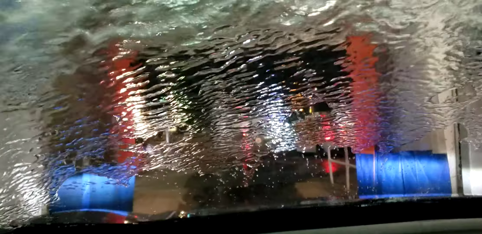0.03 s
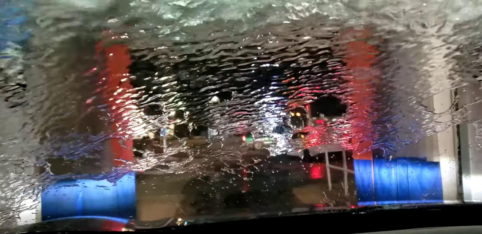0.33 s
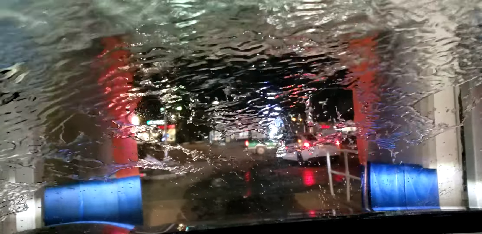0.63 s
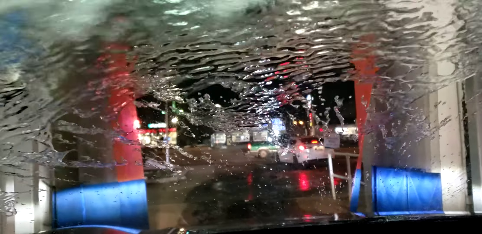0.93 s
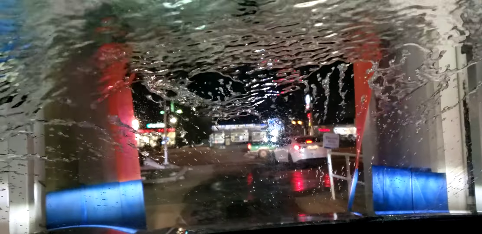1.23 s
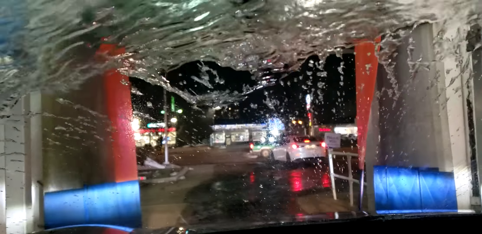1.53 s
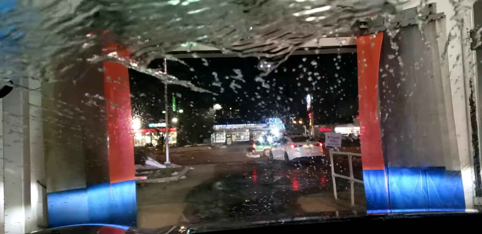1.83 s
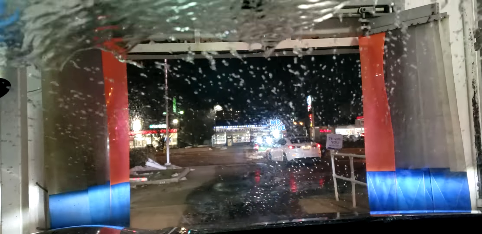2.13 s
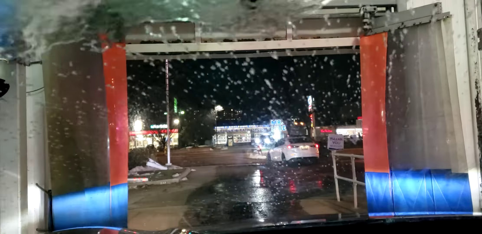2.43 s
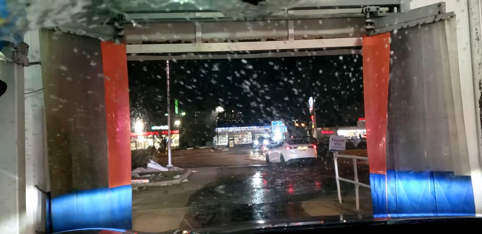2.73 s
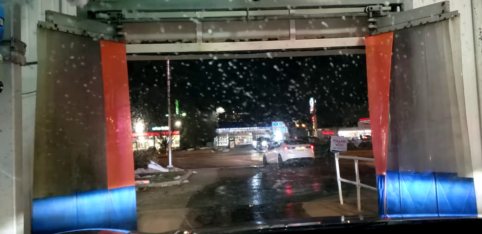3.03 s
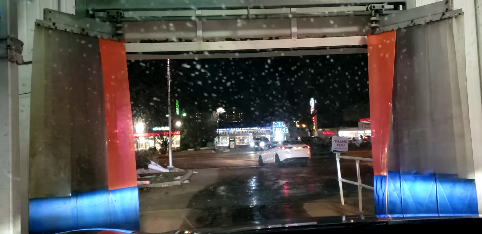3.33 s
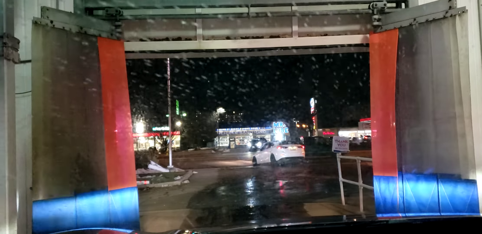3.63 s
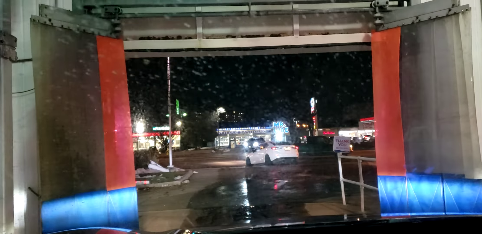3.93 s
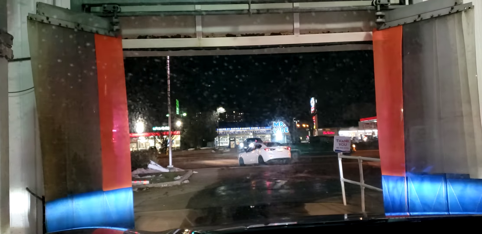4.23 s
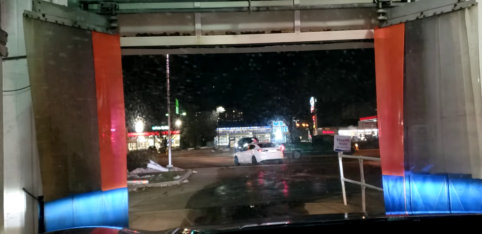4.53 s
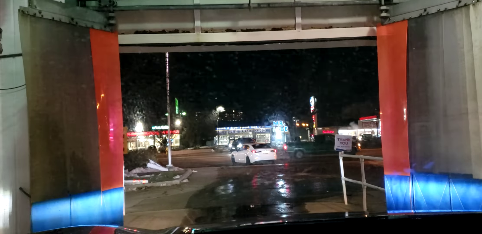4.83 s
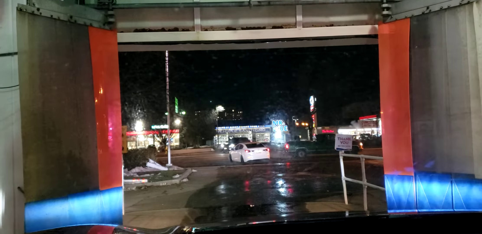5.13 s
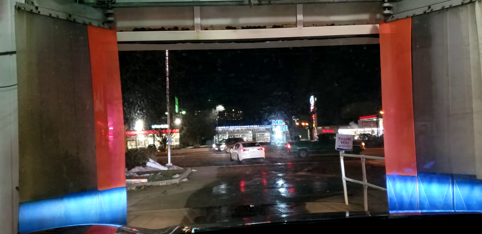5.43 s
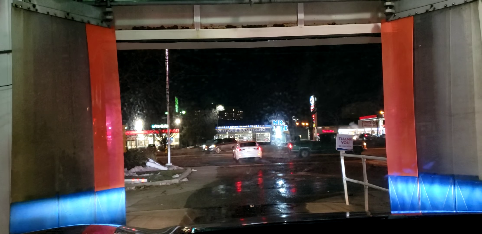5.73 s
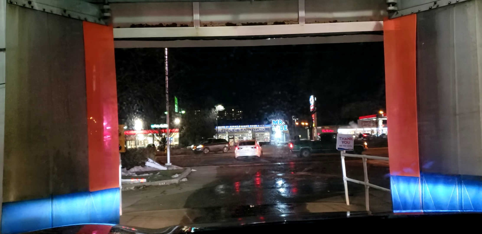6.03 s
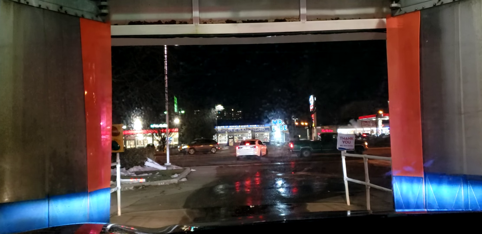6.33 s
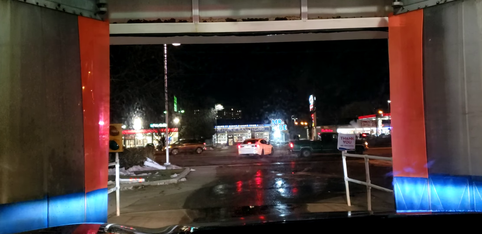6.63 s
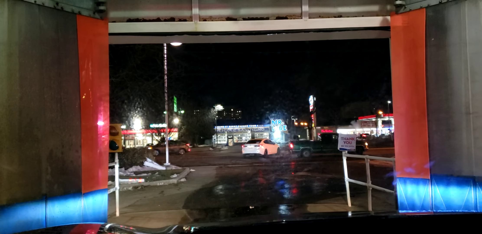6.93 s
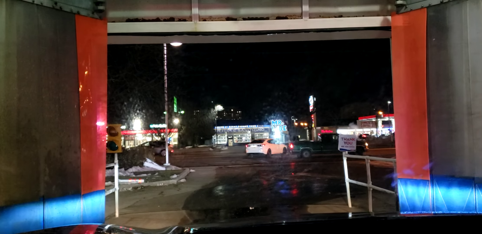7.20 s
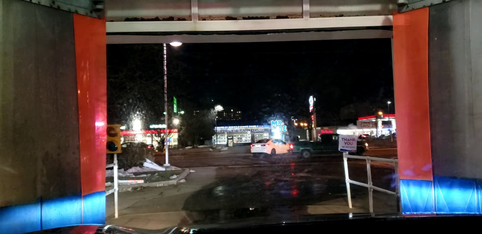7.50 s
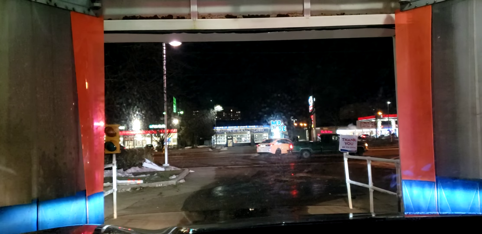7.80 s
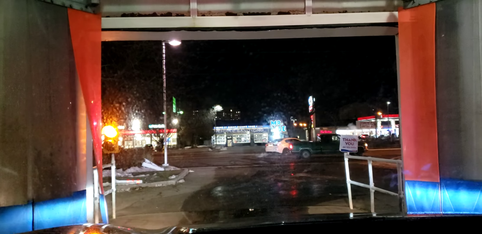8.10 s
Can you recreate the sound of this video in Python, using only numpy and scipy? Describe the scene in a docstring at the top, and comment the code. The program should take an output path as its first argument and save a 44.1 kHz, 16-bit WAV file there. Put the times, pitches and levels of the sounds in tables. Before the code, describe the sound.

Loud dryer air drums and hisses on a car, heard from inside, as light splatters thin out and a hollow howl builds.

```python
"""An automatic car wash, heard inside a car rolling under the dryer blowers.
Jets of air boom and drum on the body while the fans roar, hiss and whine through the closed windows.
At first the air tears water off the windscreen in splatters; later a faint spray and stray drops remain.
Near the end the last nozzle catches the rear of the car with a hollow, hooting howl."""
import sys
import numpy as np
from scipy import signal
from scipy.fft import rfft, irfft
from scipy.io import wavfile
from scipy.ndimage import uniform_filter1d

SR = 44100
rng = np.random.default_rng(int(sys.argv[2]) if len(sys.argv) > 2 else 0)


def put_to_file(sound):
    """Save the sound as 16-bit audio at rate SR, in the file named by the first command-line argument."""
    columns = np.atleast_2d(sound).T  # one column per channel
    safe = np.clip(columns, -1, 1)
    whole_steps = np.round(safe * 32767)
    wavfile.write(sys.argv[1], SR, whole_steps.astype(np.int16))


N = 368676
TIME = np.arange(N) / SR
HZ = np.fft.rfftfreq(N, 1 / SR)


def gain_of(db):
    return 10 ** (np.asarray(db) / 20)


def unit_level(x):
    return x / np.sqrt(np.mean(x ** 2) + 1e-20)


def at_pitch(table, hz):
    """A table's value at any frequency, joining its points on a log scale."""
    f, value = np.transpose(table)
    return np.interp(np.log(hz + 1), np.log(f + 1), value)


def over_time(table):
    """A table's value at every sample, joining its points with straight lines."""
    return np.interp(TIME, *np.transpose(table))


def drift(rate_hz):
    """A random wobble of size 1, rarely faster than rate_hz."""
    return unit_level(irfft(rfft(rng.standard_normal(N)) * np.exp(-(HZ / rate_hz) ** 2), N))


def steadied(x, seconds):
    """Evens out a noise's loudness, averaged over the given time."""
    power = uniform_filter1d(x.mean(0) ** 2, int(seconds * SR))
    return x / np.sqrt(abs(power) + 1e-9)


def swells(rows):
    """Loudness curve of smooth swells (middle t/s, length/s, level/dB)."""
    return sum(gain_of(db) * np.cos(np.pi * np.clip((TIME - t) / length, -.5, .5))
               for t, length, db in rows)


def bursts(rows, rise_s, decay_s):
    """Loudness curve of hits (t/s, hold/s, level/dB) that rise, hold and die away."""
    power = np.zeros(N)
    for t, hold, db in rows:
        span = slice(max(int((t - rise_s) * SR), 0), int((t + .5) * SR))
        age = TIME[span] - t
        attack = np.clip(1 + age / rise_s, 0, 1)
        tail = np.exp(-np.maximum(age - hold, 0) / decay_s)
        power[span] += (gain_of(db) * attack * tail) ** 2
    return np.sqrt(power)


EAR_LIKENESS = [(30, .995), (60, .975), (170, .96), (250, .8), (350, .82), (500, .55), (720, .36),
                (1030, -.03), (1460, -.25), (2100, 0), (15000, 0)]  # how alike the two ears hear it: f/Hz, likeness (1 = the same)
LEFT_LEAD = [(60, -.2), (180, -.1), (245, -.36), (320, .04), (490, -.15), (580, .3), (660, -.1),
             (880, -.45), (1100, .4), (2000, 0)]  # how far the left ear is ahead: f/Hz, phase/rad
LEFT_BALANCE = [(60, -1.5), (120, -2), (175, -0.5), (260, -6), (350, -3.5), (450, -1.5), (850, -5),
                (1500, -5.5), (2900, -5.5), (3800, -10), (5300, -14.5), (6800, 0.5), (7600, -5), (8800, 6),
                (11700, -8.5), (14000, 5)]  # how much louder the left ear is: f/Hz, level/dB
def two_ears(a, b, hz, lead=0):
    """Mixes two unrelated sounds into left and right: alike in the bass, different higher up."""
    likeness = np.clip(at_pitch(EAR_LIKENESS, hz), -1, 1)
    tilt = gain_of(at_pitch(LEFT_BALANCE, hz) / 2)
    left = a * tilt * np.exp(1j * lead)
    right = (likeness * a + np.sqrt(1 - likeness ** 2) * b) / tilt
    return np.array([left, right]) / np.sqrt(tilt ** 2 + tilt ** -2 + 2 * likeness)


def cabin(tone, noises):
    """Two noises as heard in the car, shaped by a tone table (how strong each frequency is)."""
    ears = two_ears(*rfft(noises), HZ, lead=at_pitch(LEFT_LEAD, HZ))
    in_band = (HZ >= tone[0][0]) & (HZ <= tone[-1][0])
    sound = irfft(ears * in_band * gain_of(at_pitch(tone, HZ)), N)
    return sound / np.std(sound.mean(0))


def air(tone):
    """Swirling air makes noise with the given tone."""
    return cabin(tone, rng.standard_normal((2, N)))


BOOM_TONE = [(12, -34), (25, -25.5), (33, -17.5), (43, 4.5), (55, 3), (63, 1), (75, -12)]  # the whole body shaking: f/Hz, level/dB
DRUM_TONE = [(50, -29.5), (63, -2), (76, -1.5), (90, -2.5), (102, 0), (113, 1.5), (125, -2), (145, -8.5),
             (165, -20.5), (230, -17.5), (330, -45)]  # roof and glass drumming: f/Hz, level/dB
BOOM_LEVEL = [(0, -36.5), (1.3, -33.5), (3.1, -34.5), (4.3, -36), (5, -35.5), (6, -34.5), (6.9, -33.5),
              (7.22, -41), (7.6, -35.5), (8.36, -33)]  # the boom between gusts: t/s, level/dB
PRESSURE = [(0, -2.5), (.55, 1.5), (1.4, -2.5), (2, 1), (2.4, -2), (3.05, 0), (3.3, 3), (3.6, -1),
            (4.35, 4), (5.2, -.5), (6.3, -8.5), (7, -5.5), (8.36, -3.5)]  # how hard the jets press on windscreen and roof: t/s, level/dB
GUSTS = [(.558, 0.16, -30, -45), (.805, .2, -26, -45), (.982, .13, -23.5, -45), (1.754, .25, -30, -45),
         (1.96, 0.14, -30, -45), (2.747, .13, -26, -45), (3.313, 0.15, -40, -26), (3.66, 0.14, -26, -45),
         (3.883, 0.14, -26, -27), (4.255, 0.15, -36, -23.5), (4.52, .16, -28.5, -33), (5.7, .22, -36, -45),
         (6.43, .1, -31, -45), (6.783, 0.25, -42, -30), (6.99, .079, -24, -45), (7.615, .1, -27, -45),
         (7.768, 0.17, -33, -26), (8.218, 0.14, -27, -48)]  # shoves of air: t/s, length/s, boom level/dB, drum level/dB
def jets():
    """Gusts shake the whole body, and the air drums on roof and glass as hard as it presses."""
    t, length, boom_db, drum_db = np.transpose(GUSTS)
    steady_boom = gain_of(over_time(BOOM_LEVEL) + .82 * drift(rate_hz=4.6))
    steady_drum = gain_of(-27 + over_time(PRESSURE))
    boom = np.hypot(steady_boom, swells(zip(t, length, boom_db)))
    drum = np.hypot(steady_drum, swells(zip(t, length, drum_db)))
    return boom * steadied(air(BOOM_TONE), seconds=.13) + drum * steadied(air(DRUM_TONE), seconds=.18)


ROAR_TONE = [(200, -23), (290, -11.5), (355, 1), (410, -3.5), (445, 0), (490, -6.5), (550, -14), (620, -21),
             (800, -44)]  # low roar of the nozzles: f/Hz, level/dB
RUSH_TONE = [(310, -37.5), (520, -2), (552, -3), (570, -6.5), (601, -5), (625, 0.5), (717, -3.5), (756, -5),
             (862, -7), (939, -11.5), (1160, -16), (1860, -22), (2500, -19), (3250, -47), (5500, -120)]  # their mid-pitched rush: f/Hz, level/dB
HISS_TONE = [(1500, -22.5), (2300, -5), (2850, 1), (3250, 1.5), (3750, -1), (4400, -2), (5000, -2),
             (5500, -6.5), (6500, -23), (8100, -35.5), (9000, -33.5), (11400, -37.5), (12900, -39.5),
             (13300, -50), (15700, -52)]  # their high hiss: f/Hz, level/dB
FLOW = [(0, 0.5), (.3, 0.2), (1.15, 0.56), (2.1, -0.3), (2.9, -0.5), (4.3, 0), (5.75, -2), (6.6, -2),
        (6.88, -1), (7.07, -0.3), (7.25, -0.5), (7.48, 0.6), (7.95, 0.7), (8.1, -1.1), (8.36, 1.1)]  # air reaching the car, easing between front and rear blowers: t/s, level/dB
REAR_SHARE = [(5.9, 0), (6.7, 0.43), (7.05, 0.38), (7.17, 0.52), (7.5, 0.78), (7.7, 0.63), (8, 1),
              (8.36, 0.9)]  # how fully the last jet catches the car's rear: t/s, share (0-1)
def nozzles():
    """Air leaving the nozzles roars, rushes and hisses, louder as more of it flows."""
    flow_db, pressure_db, rear = map(over_time, (FLOW, PRESSURE, REAR_SHARE))
    roar_db = -37 + 1.4 * flow_db - .23 * pressure_db + .65 * rear
    roar = gain_of(roar_db) * steadied(air(ROAR_TONE), seconds=.37)
    rush = gain_of(-45.5 + .85 * flow_db + .11 * pressure_db + drift(rate_hz=15)) * air(RUSH_TONE)
    hiss = gain_of(-48 + flow_db + .3 * rear + .74 * drift(rate_hz=21)) * air(HISS_TONE)
    return roar + rush + hiss


DRONE_TONE = [(125, -19), (148, -1.5), (165, -0.5), (176, -2.5), (186, -5.5), (200, -11.5), (230, -24)]  # the cabin ringing low: f/Hz, level/dB
HOWL_TONE = [(180, -22.5), (212, -7.5), (255, -0.5), (290, -3), (330, -0.5), (375, -4.5), (420, -19),
             (520, -30)]  # the hollow howl above it: f/Hz, level/dB
def roof_howl():
    """Air along the roof rings the cabin, swelling to a howl as the rear passes under the last nozzle."""
    flow_db, pressure_db, rear = map(over_time, (FLOW, PRESSURE, REAR_SHARE))
    drone_db = -36 + .11 * pressure_db - .5 * flow_db + 4.8 * rear
    drone = gain_of(drone_db) * steadied(air(DRONE_TONE), seconds=.47)
    from_roof = gain_of(-38 + .3 * pressure_db + .79 * flow_db)
    from_rear = gain_of(-31.5) * rear
    howl = np.hypot(from_roof, from_rear) * steadied(air(HOWL_TONE), seconds=.25)
    return drone + howl


def fan(spin_hz, notes, wander, echo, echo_hz):
    """A fan sings at multiples of its unsteady spin rate; tunnel echoes make each note waver."""
    turns = np.cumsum(spin_hz * (1 + wander * drift(rate_hz=1.97))) / SR
    moments = np.arange(0, TIME[-1] + 1, 1 / echo_hz)
    out = np.zeros((2, N))
    for multiple, db in notes:
        # complex numbers carry both the strength and the phase of a note
        direct = np.exp(2j * np.pi * rng.random((2, 1)))
        echoes = echo * (rng.standard_normal((2, len(moments), 2)) @ [1, 1j])
        ears = two_ears(*(direct + echoes), multiple * np.mean(spin_hz))
        waver = np.array([np.interp(TIME, moments, ear) for ear in ears])
        note = (waver * np.exp(2j * np.pi * multiple * turns)).real
        out += gain_of(db) * unit_level(note)
    return out


NEAR_SPIN = [(0, 58.12), (1.15, 58.04), (3.6, 58.11), (4.5, 58.04), (5.3, 58.04), (6.5, 58.11), (7.4, 58),
             (8.36, 57.98)]  # the near fan's spin rate, sagging a little under load: t/s, f/Hz
WHINE_NOTES = [(49, -69), (51, -63.5), (52, -70), (53, -66), (54, -64), (55, -64.5), (56, -64.5), (57, -65),
               (58, -69), (59, -66.5), (60, -66), (61, -65), (66, -71), (69, -71), (70, -69), (71, -62.5),
               (72, -68.5), (73, -63), (74, -67), (75, -72), (76, -65), (77, -67.5), (78, -69), (79, -69),
               (80, -67.5), (81, -67.5), (83, -66.5), (84, -72), (86, -70), (91, -71)]  # its high notes: multiple of the spin rate, level/dB
WHISTLE_TONE = [(2700, -21.5), (2960, -8.5), (3220, -1.5), (3520, -6.5), (3800, -20), (4200, -1.5),
                (4500, -4), (4900, -7.5), (5500, -21)]  # air whistling in its outlet: f/Hz, level/dB
def near_fan():
    """The near fan whines over a breathy whistle; both grow with the air flow and the last jet."""
    boost_db = .83 * over_time(FLOW) + 3.4 * over_time(REAR_SHARE)
    whine = fan(over_time(NEAR_SPIN), WHINE_NOTES, wander=.000352, echo=1.2, echo_hz=11)
    whistle = gain_of(-62 + 1.4 * boost_db) * air(WHISTLE_TONE)
    return gain_of(boost_db) * whine + whistle


HUM_NOTES = [(3, -45.5), (6, -52), (10, -50), (12, -62.5)]  # the far fan's low notes: multiple of the spin rate, level/dB
HUM_BOOST = [(0, -3), (.8, 0), (1.6, -0.5), (2.15, 0), (3.5, -3), (4.25, -4), (4.55, 4), (4.9, -16),
             (5.4, 2.5), (5.8, 1), (6.35, -2.5), (7.1, 0), (7.65, 2), (8.36, -1)]  # how their loudness rises and falls: t/s, level/dB
def far_fan():
    """A second fan hums, coming and going as the car rolls on."""
    hum = fan(spin_hz=58.9, notes=HUM_NOTES, wander=.0025, echo=.46, echo_hz=12)
    return gain_of(over_time(HUM_BOOST)) * hum


def droplets(tone, per_s, spread_db):
    """A dense patter of tiny hits, a few of them larger."""
    size = gain_of(spread_db * np.minimum(rng.exponential(1, (2, N)), 4))
    sign = rng.choice([-1, 1], (2, N))
    hits = rng.random((2, N)) < per_s / SR
    return cabin(tone, size * sign * hits)


SPRAY_TONE = [(350, -27), (600, -5), (850, 6), (1200, 0), (1600, -3), (2200, -6.5), (3000, -16),
              (5200, -21), (6500, -23.5), (8000, -36.5), (11300, -29), (13000, -36.5), (15500, -46.5)]  # fine spray on glass: f/Hz, level/dB
SPRAY_LEVEL = [(0, -40), (.17, -47), (.6, -45), (1.15, -46.5), (1.55, -46), (2.2, -47), (3, -48.5),
               (3.7, -47.5), (4.5, -50.5), (5.3, -52), (8.36, -49)]  # how loud the spray is: t/s, level/dB
def spray():
    """Water blown over the windscreen patters in gusts."""
    level_db = over_time(SPRAY_LEVEL) + .71 * drift(rate_hz=26)
    return gain_of(level_db) * droplets(SPRAY_TONE, per_s=4000, spread_db=2)


THUD_TONE = [(170, -22), (240, -2.5), (320, 2), (400, -6), (480, -7), (620, -21)]  # a splatter's dull knock: f/Hz, level/dB
SLAP_TONE = [(350, -31), (650, 0), (900, 6), (1250, 1.5), (1550, -0.5), (1900, -4), (2400, -12),
             (4000, -22), (7000, -50)]  # its wet smack: f/Hz, level/dB
FIZZ_TONE = [(1200, -13), (2400, -2), (3300, 3), (5300, 2), (6500, -13), (8000, -28), (11500, -25),
             (15500, -40)]  # its bright fizz: f/Hz, level/dB
SPLATTERS = [(.004, 0.0064, -40.5, -43, -35), (0.028, .018, -50, -44, -43), (.058, 0.0093, -47, -50, -46),
             (0.11, .02, -44.5, -53, -38), (0.191, .006, -51, -59, -44), (0.252, 0.0079, -37, -50, -48),
             (0.277, 0.014, -41, -44, -39), (0.3, 0.018, -41.5, -49, -35), (0.37, .016, -39.5, -47, -47),
             (0.424, .0095, -55, -47, -50), (.462, 0.0089, -45, -55, -40), (.487, .012, -46, -53, -46),
             (0.545, 0.014, -42, -49, -34), (.611, .016, -42, -48, -34), (.642, 0.0091, -49, -50, -44),
             (0.672, .008, -42, -47, -46), (.73, .008, -41, -44, -36), (0.741, .012, -46, -42.5, -44),
             (0.76, 0.019, -39.5, -48, -35), (.822, .006, -47, -60, -47), (.884, 0.012, -40, -56, -38),
             (.924, 0.0065, -46, -54, -46), (0.943, .012, -42.5, -50, -40), (1.03, .01, -41, -48, -37),
             (1.053, 0.024, -44, -47, -38), (1.152, .01, -45, -52, -50), (1.193, 0.038, -42.5, -48, -36),
             (1.246, 0.019, -40.5, -43, -33), (1.337, .006, -47, -55, -42), (1.374, .008, -46, -58, -39),
             (1.413, .012, -44, -47, -48), (1.448, .026, -44.5, -54, -45), (1.53, .012, -46, -55, -41),
             (1.58, 0.019, -47, -57, -44), (1.616, 0.013, -41.5, -49, -38), (1.671, .012, -42.5, -52, -41),
             (1.714, .012, -45, -54, -52), (1.786, .014, -43.5, -53, -49), (1.841, 0.015, -41, -46, -39),
             (1.91, 0.023, -45, -53, -44), (2.115, 0.022, -43, -46, -45), (2.287, .016, -42.5, -48, -38),
             (2.387, 0.016, -44.5, -54, -31.5), (2.468, .0089, -45, -56, -42), (2.62, .008, -44, -50, -41),
             (2.645, .008, -45, -55, -35), (2.702, .018, -45, -55, -42), (2.993, .006, -45, -51, -37),
             (3.294, .006, -47, -59, -41), (3.497, .0067, -51, -59, -41), (3.65, .01, -48, -50, -46)]  # water landing: t/s, hold/s, slap level/dB, fizz level/dB, thud level/dB
def splatters():
    """Lumps of water thud and slap on the glass and burst into fizz."""
    t, hold, slap_db, fizz_db, thud_db = np.transpose(SPLATTERS)
    thuds = bursts(zip(t, hold, thud_db), rise_s=.0037, decay_s=.024) * air(THUD_TONE)
    coarse_patter = steadied(droplets(SLAP_TONE, per_s=3000, spread_db=2), seconds=.016)
    slaps = bursts(zip(t, hold, slap_db), rise_s=.0023, decay_s=.013) * coarse_patter
    fine_patter = steadied(droplets(FIZZ_TONE, per_s=1500, spread_db=1.5), seconds=.02)
    fizz = bursts(zip(t, hold, fizz_db), rise_s=.0018, decay_s=.008) * fine_patter
    return thuds + slaps + fizz


RINGS = [(.77, .3, 51, -55), (.98, .5, 55, -54.5), (1.2, .42, 56, -56), (1.24, .45, 51, -56),
         (1.5, .26, 60, -58), (1.53, .45, 61, -57), (1.6, .35, 56, -57.5), (1.93, .4, 53, -59),
         (2.29, .32, 60, -59), (2.41, .5, 55, -57.5), (3.05, .42, 51, -58.5), (3.28, .25, 56, -58.5),
         (4.23, .32, 56, -57.5), (4.51, .24, 59, -59.5), (4.99, .28, 56, -57), (5.48, .42, 56, -56),
         (6.48, .26, 56, -59), (7.04, .6, 56, -56), (7.14, .4, 55, -60), (7.49, .28, 56, -56),
         (7.6, .36, 51, -59), (7.69, .28, 60, -57.5), (7.75, .22, 61, -58), (7.94, .34, 56, -53.5),
         (8.28, .28, 59, -56.5)]  # fan notes that ring out: t/s, length/s, multiple of the spin rate, level/dB
def fan_rings():
    """One note of the near fan's whine after another comes forward as a wavering whistle."""
    spin_hz = over_time(NEAR_SPIN)
    out = np.zeros((2, N))
    for multiple in sorted({row[2] for row in RINGS}):
        strength = swells((t, length, db) for t, length, m, db in RINGS if m == multiple)
        out += strength * fan(spin_hz, [(multiple, 0)], wander=.0003, echo=.35, echo_hz=18)
    return out


TICK_TONE = [(2000, -20), (6000, -3), (8500, -10), (11500, -4), (13000, -5), (15500, -21)]  # one drop's sharp tick: f/Hz, level/dB
DROPS = [(.808, -50.5), (.9772, -63), (1.0271, -58), (2.5037, -58), (2.852, -64), (2.9991, -62),
         (4.9606, -65), (6.372, -68), (8.305, -67)]  # single drops landing: t/s, level/dB
def drops():
    """Stray drops tick on the glass."""
    hold_s = .00056
    return bursts([(t, hold_s, db) for t, db in DROPS], rise_s=.0004, decay_s=.001) * air(TICK_TONE)


HOOTS = [(7.19, 0.23, 370, -32.5), (7.39, 0.32, 338, -38.5), (7.716, .22, 274, -32.5),
         (8.006, 0.17, 265, -32), (8.303, 0.19, 376, -35.5)]  # hollow hoots within the howl: t/s, length/s, f/Hz, level/dB
def hoots():
    """The howl gathers briefly on one narrow pitch, then on another."""
    half_width_hz = 74
    out = np.zeros((2, N))
    for t, length, hz, db in HOOTS:
        tone = [(hz - half_width_hz, -24), (hz, 0), (hz + half_width_hz, -24)]
        out += swells([(t, length, db)]) * steadied(air(tone), seconds=.13)
    return out


def scene():
    blowers = jets() + nozzles() + roof_howl() + near_fan() + far_fan()
    return blowers + spray() + splatters() + fan_rings() + drops() + hoots()


def record(dry):
    """Softens the start and end and cuts the very highest treble."""
    fade_s, cutoff_hz = .003, 15720
    fade = np.minimum(np.minimum(TIME, TIME[-1] - TIME) / fade_s, 1)
    low_pass = signal.firwin(511, cutoff_hz, window=("kaiser", 9), fs=SR)
    return signal.oaconvolve(dry * fade, low_pass[None], "same")


dry = scene()
out = record(dry)
put_to_file(out)
```